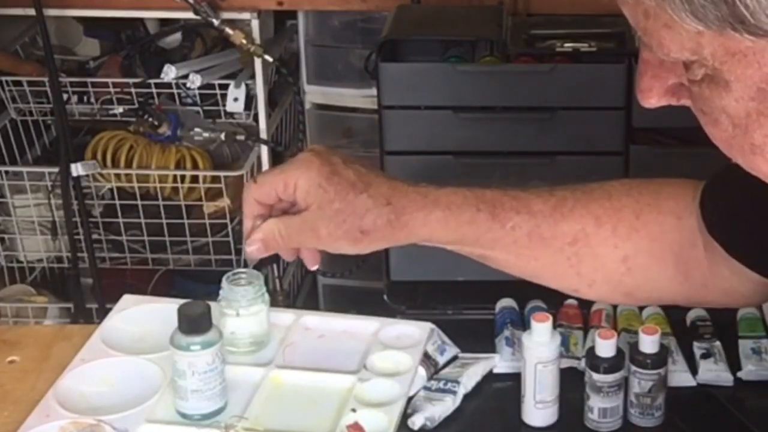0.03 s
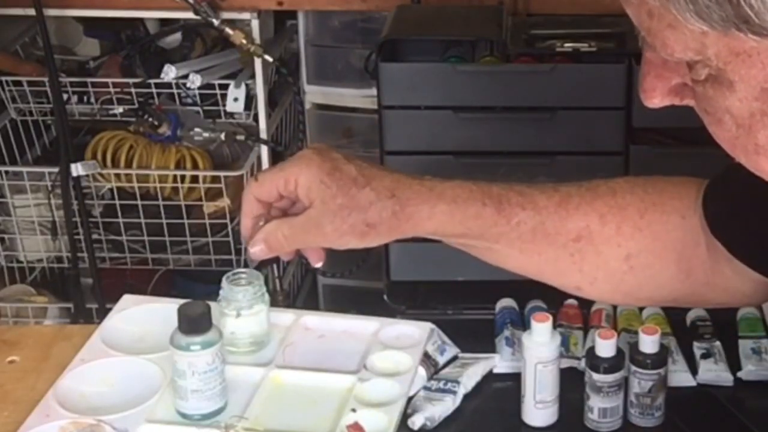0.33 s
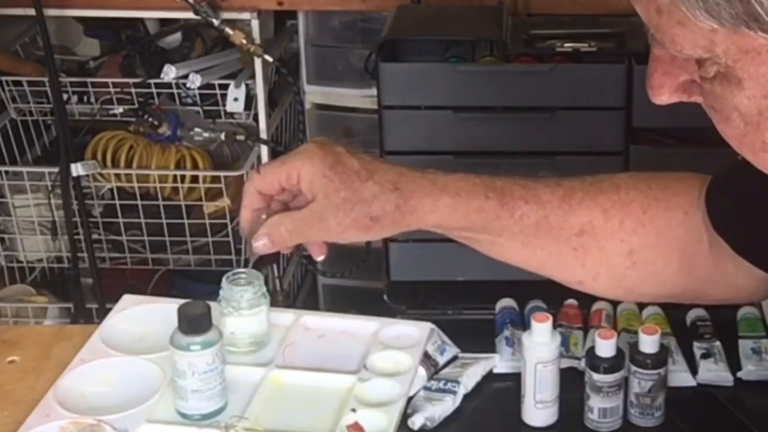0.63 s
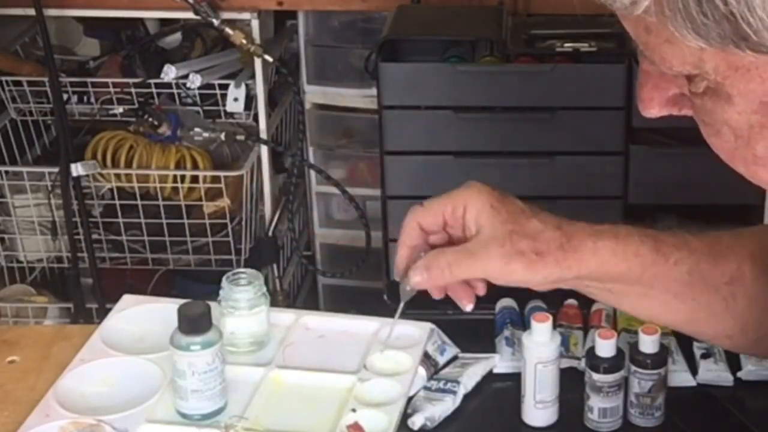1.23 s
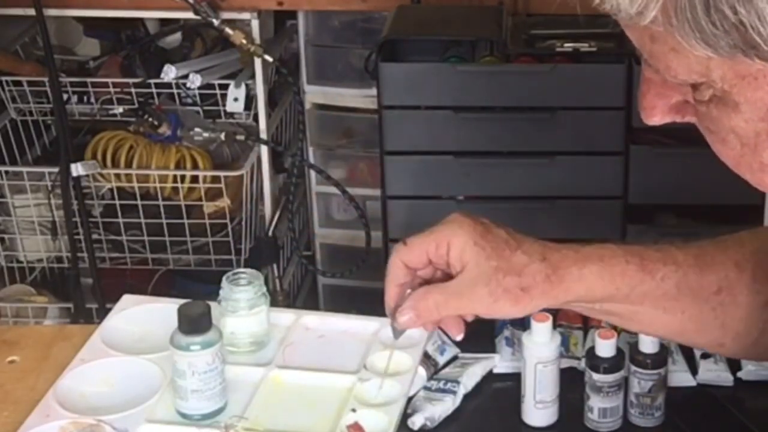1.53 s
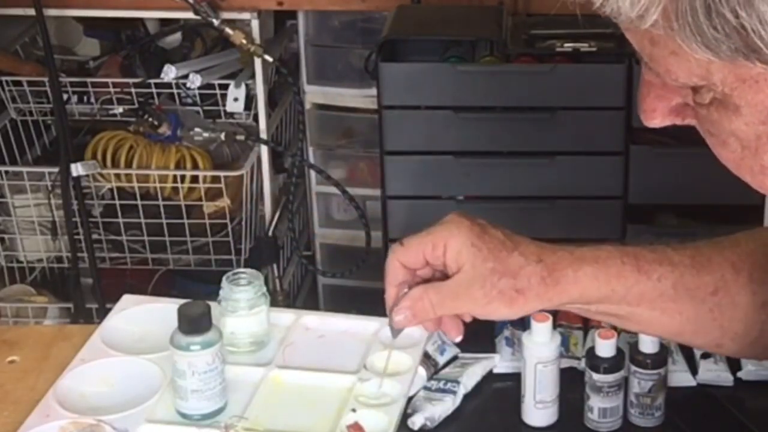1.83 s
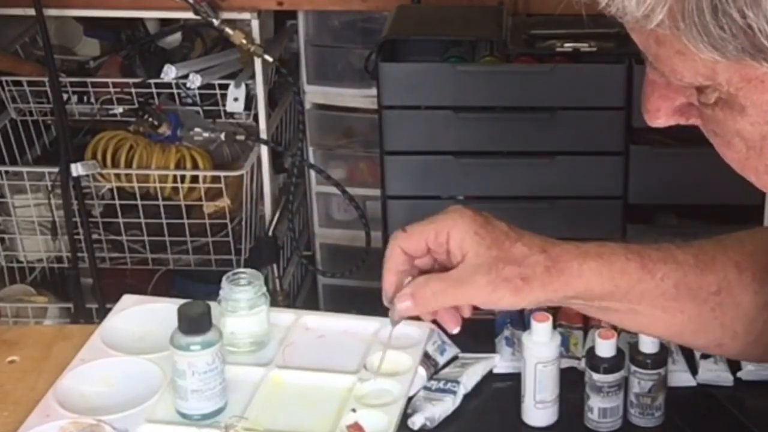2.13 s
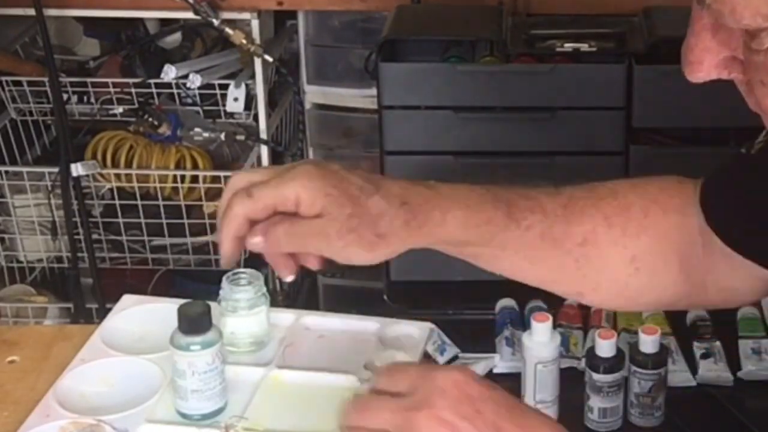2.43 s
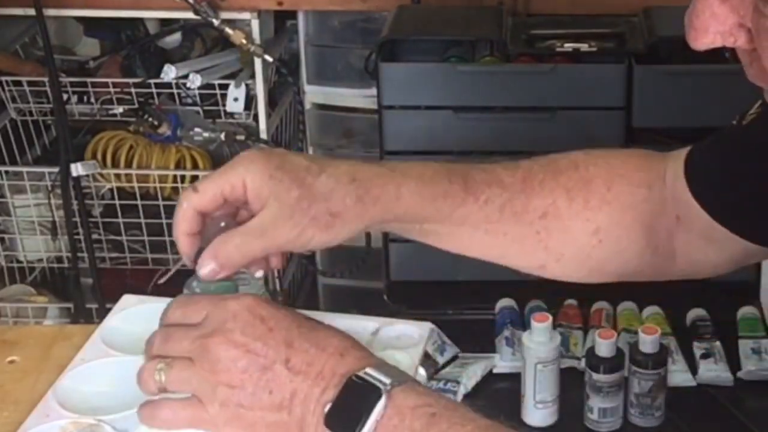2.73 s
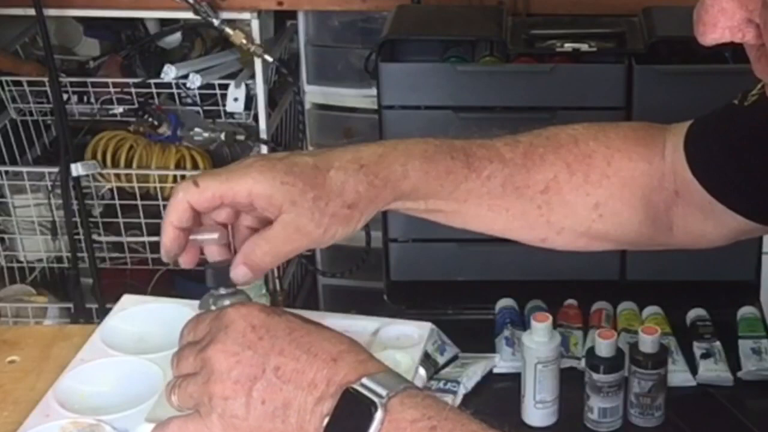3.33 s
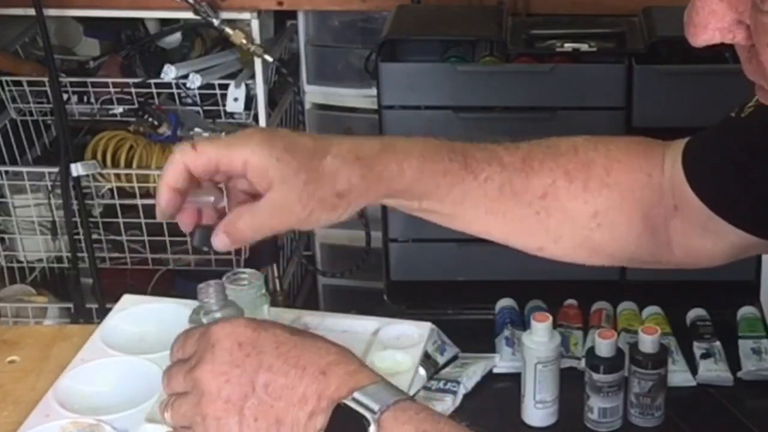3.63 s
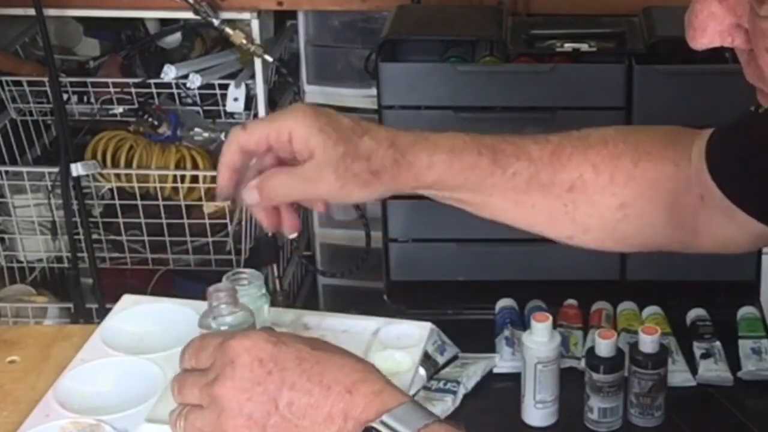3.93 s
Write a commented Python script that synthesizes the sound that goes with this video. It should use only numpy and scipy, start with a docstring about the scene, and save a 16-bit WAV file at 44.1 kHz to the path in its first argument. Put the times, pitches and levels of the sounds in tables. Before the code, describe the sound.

In a quiet, hissy workshop, a close microphone catches a light dropper tick, soft finger bumps and four faint turns of a cap. Then comes the main sound: a small glass bottle set down on plastic with one sharp knock.

```python
"""A quiet workshop: a steady rush of air, with a faint electrical ticking in the microphone hiss.
At 0.6 s a dropper brushes the neck of a small glass bottle. At 2 s it ticks on a plastic paint palette
and its tip spits a few tiny pops. At 2.5 s a hand takes hold of the bottle with soft bumps; the cap
ticks on the rim and is screwed on in four turns, the thread rubbing. At 3.74 s the bottle is set down
with one sharp knock that sets both glass and palette ringing."""
import sys
import numpy as np
from scipy import signal
from scipy.fft import rfft, irfft
from scipy.io import wavfile

SR = 44100
rng = np.random.default_rng(int(sys.argv[2]) if len(sys.argv) > 2 else 0)


def output_pcm(signal):
    """Save a mono or channel-first signal as 16-bit PCM at the path in sys.argv[1].

    Samples are clipped to [-1, 1] before scaling.
    """
    pcm = np.clip(np.atleast_2d(signal).T, -1, 1) * 32767
    wavfile.write(sys.argv[1], SR, np.round(pcm).astype(np.int16))


N = 176400
TIME = np.arange(N) / SR
FREQ = np.maximum(np.fft.rfftfreq(N, 1 / SR), 1)


def from_db(db):
    """Decibels to gain."""
    return 10 ** (np.asarray(db) / 20)


def noise(gains):
    """Noise shaped by a gain at each frequency, scaled to rms 1."""
    x = irfft(rfft(rng.standard_normal(N)) * gains, N)
    return x / x.std()


def colour(points):
    """EQ curve through rows of freq_hz, level_db."""
    hz, db = np.transpose(points)
    return from_db(np.interp(np.log(FREQ), np.log(hz), db))


def hump(hz, octaves):
    """Bell-shaped EQ curve of one resonance."""
    return np.exp(-.5 * (np.log2(FREQ / hz) / octaves) ** 2)


def drift(rate_hz):
    """Random wobble of rms 1, mostly slower than rate_hz."""
    return noise(1 / (1 + (FREQ / rate_hz) ** 2))


def dying(start_s, t60_s, rise_s=0):
    """Envelope of a hit: an attack, then an exponential decay."""
    age = np.maximum(TIME - start_s, 0)
    attack = 1 - np.exp(-age / max(rise_s, 1 / SR))
    return attack * from_db(-60 * np.minimum(age / t60_s, 10))


def swell(peak_s, rise_s, fall_s):
    """Envelope of a stroke: a smooth fade in and out."""
    return np.exp(-.5 * ((TIME - peak_s) / np.where(TIME < peak_s, rise_s, fall_s)) ** 2)


def clicks(rows):
    """One impulse for each row of start_s, level_db."""
    out = np.zeros(N)
    for start_s, db in rows:
        out[int(start_s * SR)] += from_db(db)
    return out


def ring(x, hz, t60_s):
    """Resonator: a unit click sets off a decaying tone of height 1."""
    radius, angle = np.exp(-np.log(1000) / (t60_s * SR)), 2 * np.pi * hz / SR
    return signal.lfilter([.5, 0, -.5], [1, -2 * radius * np.cos(angle), radius * radius], x + 1e-18)


def ring_modes(x, modes, soft_hz=np.inf):
    """Resonator bank in alternating polarity; modes above soft_hz are muted, as by a soft touch."""
    return sum((-1) ** k * from_db(db) / (1 + (hz / soft_hz) ** 2) * ring(x, hz, t60_s)
               for k, (hz, db, t60_s) in enumerate(modes))


# EQ of the air and hiss bed: freq_hz, level_db
AIR_EQ = [(25, -41), (45, -37), (65, -21.5), (100, -5), (170, -2), (280, -1.5), (430, 0), (620, -1.5),
          (850, -8.5), (1300, -11), (2000, -15), (2700, -15.5), (3800, -19.5), (6000, -22.5), (9000, -23),
          (13000, -20), (15500, -29)]
# resonances in the rush: pitch_hz, boost_db
AIR_PEAKS = [(355, 4), (438, 2.3)]
# fader ride on the low rush: time_s, gain_db
RUSH_RIDE = [(0, -2.5), (.36, -0.3), (.46, 2.8), (.8, -0.5), (1.4, 0.7), (1.8, -0.3), (2.4, 1), (3.2, 0.5),
             (4, 1.5)]


def air():
    """A wavering low rush of air with two narrow resonances, under steady hiss."""
    bed_db, rush_top_hz, waver_db = -50.5, 895, 1.43
    peaks = from_db(sum(db * hump(hz, octaves=.035) for hz, db in AIR_PEAKS))
    bed = from_db(bed_db) * noise(colour(AIR_EQ) * peaks)
    rush = irfft(rfft(bed) / (1 + (FREQ / rush_top_hz) ** 2) ** 2, N)
    hiss = bed - rush
    rush_db = np.interp(TIME, *np.transpose(RUSH_RIDE)) + waver_db * drift(rate_hz=24)
    return hiss + from_db(rush_db) * rush


# resonances that colour the electrical ticking: pitch_hz, gain_db, t60_s
BUZZ_MODES = [(6800, -11, 0.0036), (9340, -3.5, 0.003), (12700, -1, .002), (14700, 4, 0.0022)]


def electrical_ticking():
    """Forty pairs of tiny bright clicks a second, a little uneven in timing and level."""
    first_s, period_s, pair_gap_s, jitter_s = .0081, .025006, .0007, .00004
    click_db, spread_db = -47.5, 2.6
    pair_starts = np.arange(first_s, TIME[-1] - period_s / 2, period_s)
    late, louder = rng.standard_normal((2, len(pair_starts), 2))
    starts = pair_starts[:, None] + [0, pair_gap_s] + jitter_s * late
    levels = click_db + spread_db * louder
    return ring_modes(clicks(zip(starts.ravel(), levels.ravel())), BUZZ_MODES)


def dropper_brush():
    """The dropper brushes the bottle's neck on its way out: a short, airy wisp."""
    stroke = swell(peak_s=.622, rise_s=.022, fall_s=.022)
    return from_db(-58.5) * stroke * noise(hump(hz=11300, octaves=.2))


# EQ of the dropper touching the palette: freq_hz, level_db
PALETTE_TICK = [(700, -28), (2500, -17), (4800, -10), (6800, -25), (8500, -2), (11000, 1.5), (12300, 0),
                (13600, 0), (15800, -13)]
# EQ of the cap touching the rim: freq_hz, level_db
CAP_TICK = [(1500, -23), (6500, -16), (9500, -14), (11000, -6), (14300, 0), (15800, -3)]
# cues for those two touches: start_s, level_db, tail_t60_s, eq_table
TICKS = [(2.0021, -26.5, 0.12, PALETTE_TICK), (2.8432, -31, 0.27, CAP_TICK)]


def contact_ticks():
    """Light, hard contacts, dropper on palette and cap on rim: a bright snap and a faint tail."""
    snap_db, tail_db = -4, -14.5
    out = np.zeros(N)
    for start_s, db, tail_t60_s, eq in TICKS:
        snap = from_db(snap_db) * dying(start_s, t60_s=.0061)
        tail = from_db(tail_db) * dying(start_s, tail_t60_s)
        out += from_db(db) * (snap + tail) * noise(colour(eq))
    return out


def bench_reflections(x):
    """Short, dense reverb from the cluttered bench."""
    response = rng.standard_normal(N) * dying(0, t60_s=.13)
    return signal.fftconvolve(x, response / np.linalg.norm(response))[:N]


# pops at the dropper's tip: start_s, level_db
POPS = [(2.0165, -46), (2.029, -47), (2.0415, -44), (2.052, -41), (2.073, -43), (2.0855, -39),
        (2.0983, -46)]


def dropper_pops():
    """The tip spits tiny pops, each a high blip that reflects off the bench."""
    pops = ring(clicks(POPS), hz=4500, t60_s=.0037)
    return pops + from_db(-4) * bench_reflections(pops)


# fingers landing on the bottle: start_s, level_db, pitch_hz
FINGER_BUMPS = [(2.512, -51, 2500), (2.53, -47.5, 850), (2.5552, -50, 3500), (2.599, -56, 2000)]
# ring of the plastic palette, under the grip and the final knock: pitch_hz, gain_db, t60_s
PALETTE_MODES = [(647, -33, 0.1), (1070, -32.5, 0.14), (1180, -27, 0.11), (1235, -30.5, 0.13),
                 (1730, -37, 0.12), (1810, -25, 0.077), (1950, -33, .09), (2040, -27, 0.12),
                 (2238, -26.5, 0.073), (2392, -33, 0.092), (2650, -31, .1), (2767, -27.5, 0.11),
                 (2985, -29, 0.095), (3140, -40, 0.15)]


def grip():
    """Fingers bump softly on the bottle; the palette under it rings dully."""
    push_gain_db = 31.5
    scuffs = sum(from_db(db) * dying(start_s, t60_s=.1, rise_s=.0033) * noise(hump(hz, octaves=1))
                 for start_s, db, hz in FINGER_BUMPS)
    pushes = clicks([(start_s, db + push_gain_db) for start_s, db, _ in FINGER_BUMPS])
    return scuffs + ring_modes(pushes, PALETTE_MODES, soft_hz=750)


# four turns, the first with a faint follow-through: peak_s, rise_s, fall_s, rub_db, ring_db
CAP_TURNS = [(2.865, .015, 0.069, -55.5, -78), (2.95, 0.018, 0.022, -68, -69),
             (3.112, 0.025, 0.028, -50, -65), (3.298, 0.027, 0.015, -52.5, -63),
             (3.515, 0.022, 0.012, -51.5, -59)]
# EQ of the thread's friction: freq_hz, level_db
THREAD_EQ = [(900, 1.5), (2500, -14), (4000, -10), (5500, -4), (8500, -8), (11000, -1.5), (12500, -4),
             (14300, 1), (15800, -6)]


def cap_turns():
    """Each turn of the cap rubs the thread: grainy friction with one narrow ring."""
    grain_db = 3
    grain = from_db(grain_db * drift(rate_hz=300))
    rub = grain * noise(colour(THREAD_EQ))
    ringing = noise(hump(hz=6170, octaves=.06))
    return sum(swell(peak_s, rise_s, fall_s) * (from_db(rub_db) * rub + from_db(ring_db) * ringing)
               for peak_s, rise_s, fall_s, rub_db, ring_db in CAP_TURNS)


# the bottle grazes the palette, lands and settles: start_s, level_db
BOTTLE_CONTACTS = [(3.7430, -31), (3.74456, -0.5), (3.7494, -21), (3.7535, -13)]
# brief crack of each contact: pitch_hz, gain_db, t60_s
CRACK_MODES = [(2140, -15.5, .016), (4860, -6, 0.0034), (5970, -1.3, 0.0025), (10300, -14.5, 0.0068)]
# ring of the glass bottle: pitch_hz, gain_db, t60_s
BOTTLE_MODES = [(3882, -38, 0.17), (4600, -29.5, 0.13), (5003, -27, 0.11), (5730, -35, 0.11),
                (6292, -34, 0.074), (6439, -33, 0.098), (6626, -30, 0.099), (6870, -23, 0.09),
                (7166, -27, 0.062), (7800, -24, 0.076), (8820, -26.5, .09), (11640, -34, 0.074),
                (13590, -25, 0.069)]
# EQ of the dense ringing and reflections after the knock: freq_hz, level_db
KNOCK_TAIL_EQ = [(200, -36), (600, -13), (1150, -6), (1500, -4.5), (2100, -4.5), (2800, 1), (3400, -4),
                 (4800, -3), (7000, 1.5), (8300, -5), (10300, -2.5), (13600, -2), (15500, -7.5)]


def bottle_knock():
    """Every contact cracks; the hardest also rings glass and palette and leaves a short, dense tail."""
    contacts = clicks(BOTTLE_CONTACTS)
    crack = sum(from_db(db) * ring(contacts, hz, t60_s) for hz, db, t60_s in CRACK_MODES)
    landing_s, landing_db = max(BOTTLE_CONTACTS, key=lambda row: row[1])
    body = ring_modes(clicks([(landing_s, landing_db)]), PALETTE_MODES + BOTTLE_MODES)
    tail_envelope = from_db(landing_db - 14.5) * dying(landing_s, t60_s=.11, rise_s=.0019)
    return crack + body + tail_envelope * noise(colour(KNOCK_TAIL_EQ))


def scene():
    """Close mono mix of ambience and props; the props are low-cut, as small objects radiate little bass."""
    low_cut_hz = 500
    low_cut = signal.butter(4, low_cut_hz, "high", fs=SR, output="sos")
    ambience = air() + electrical_ticking()
    props = dropper_brush() + contact_ticks() + dropper_pops() + grip() + cap_turns() + bottle_knock()
    return (ambience + signal.sosfilt(low_cut, props))[None]


def record(dry):
    """A steep high cut on the whole mix."""
    high_cut_hz = 15850
    return signal.sosfilt(signal.ellip(12, .1, 70, high_cut_hz, fs=SR, output="sos"), dry)


dry = scene()
out = record(dry)
output_pcm(out)
```